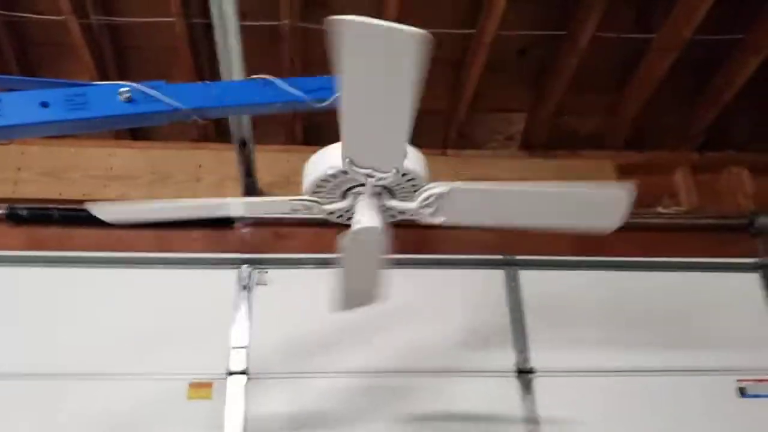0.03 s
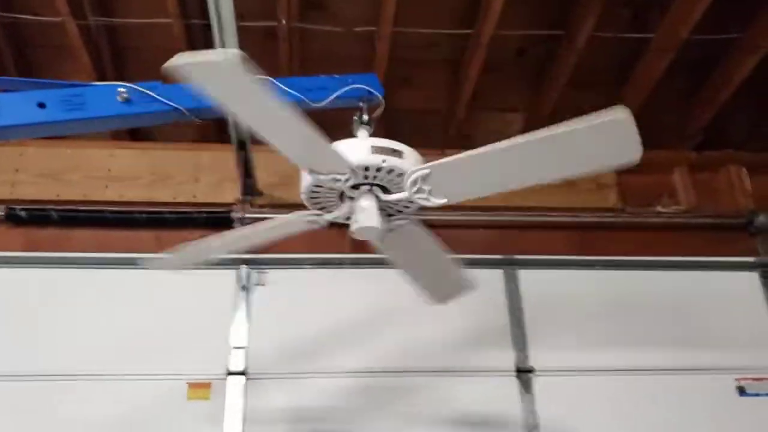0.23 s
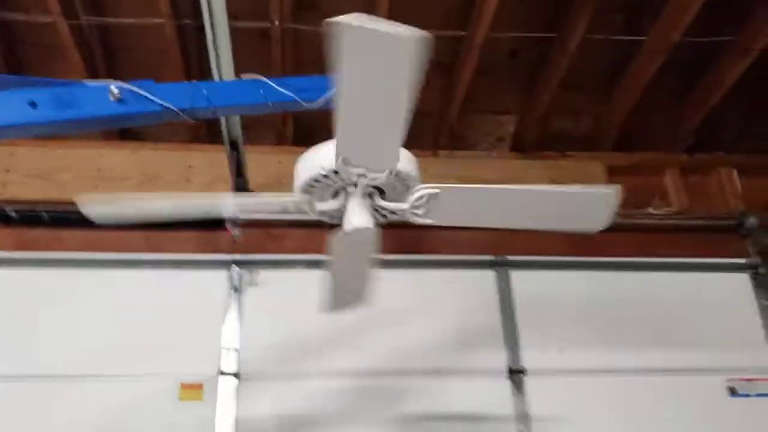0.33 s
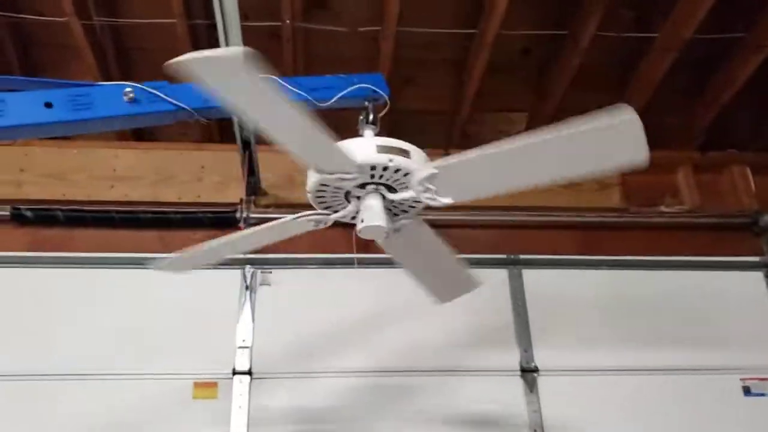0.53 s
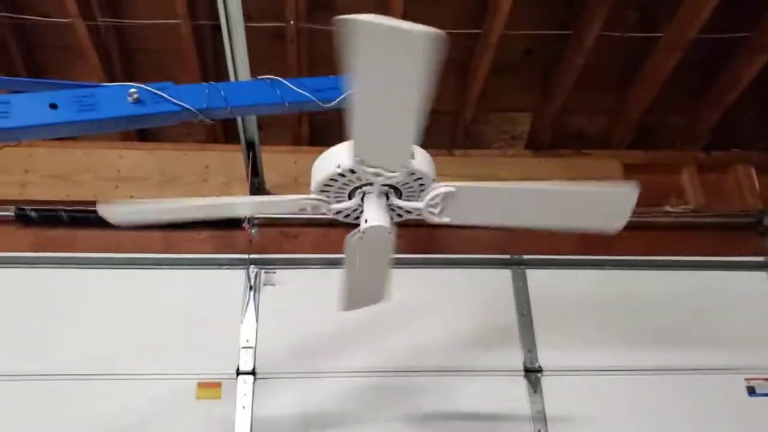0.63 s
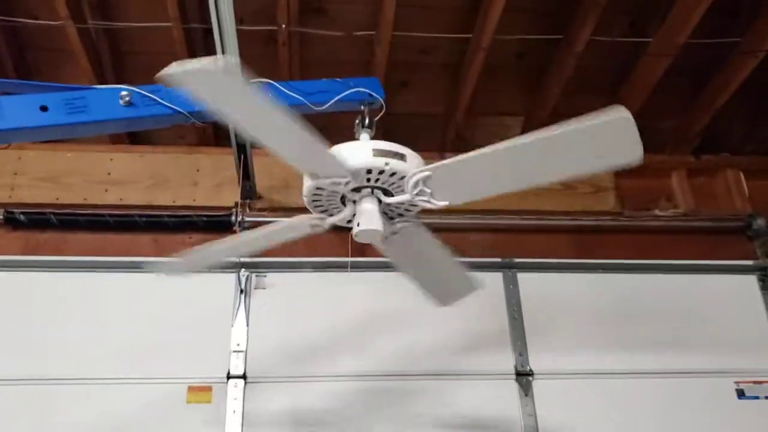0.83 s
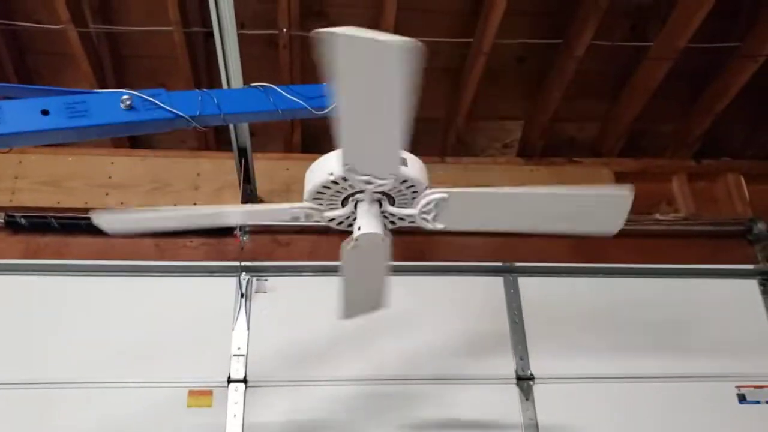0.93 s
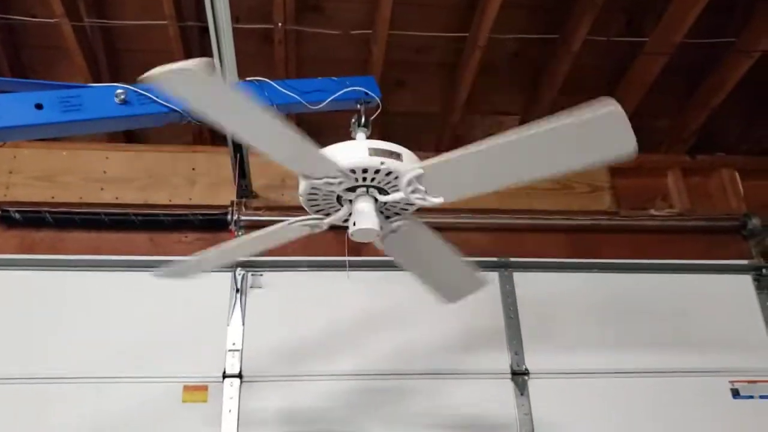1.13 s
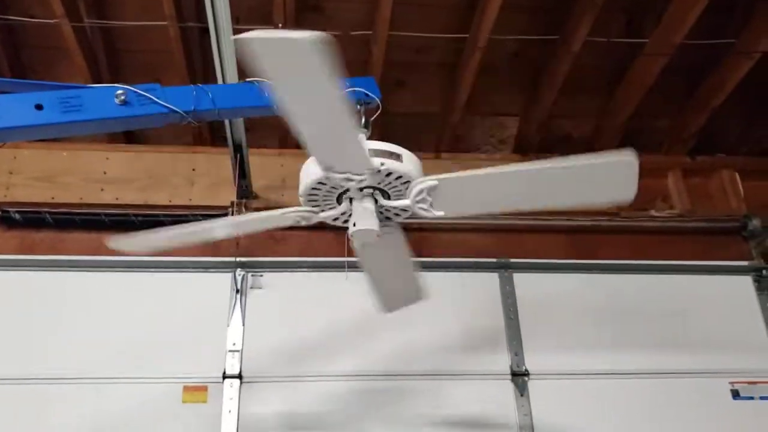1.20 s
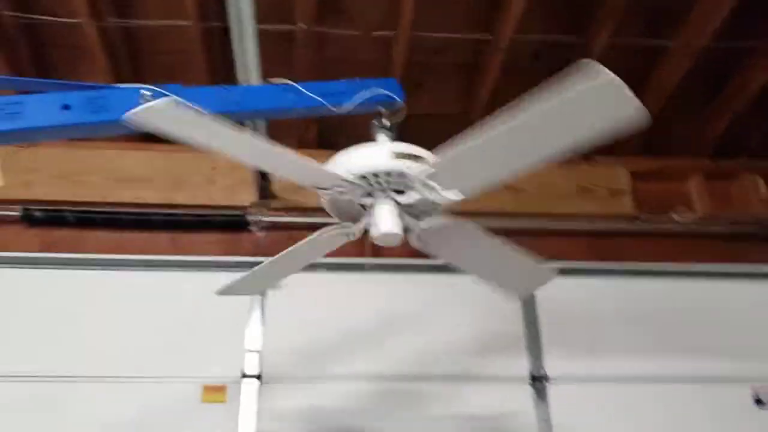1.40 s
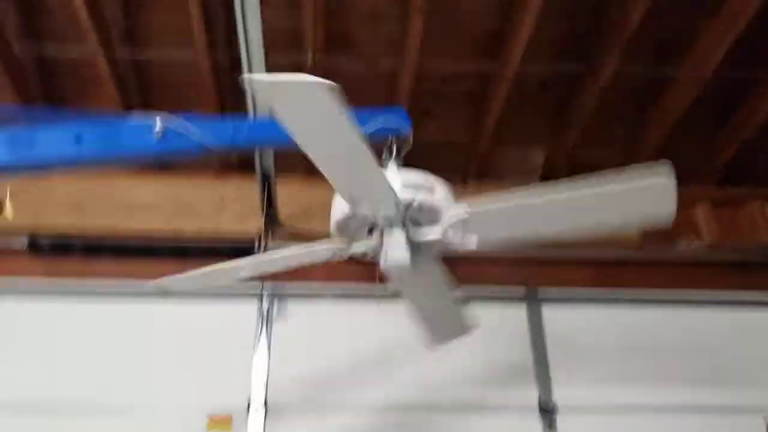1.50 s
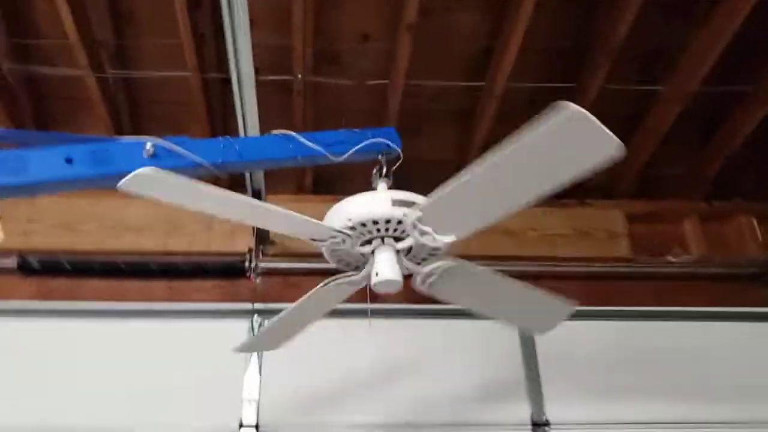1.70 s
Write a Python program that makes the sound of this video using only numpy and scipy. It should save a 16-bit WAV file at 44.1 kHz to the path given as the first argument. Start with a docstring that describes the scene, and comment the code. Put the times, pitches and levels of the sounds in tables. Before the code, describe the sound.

A ceiling fan hums faintly, with two louder bumps from a hand on the microphone.

```python
"""A ceiling fan turns slowly in a garage: its motor hums faintly over a soft hiss of air.
The hand that holds the microphone shifts its grip twice. Fingers knock and scrape on the case,
which rings and thumps, then skin slides over it. The case also gives a few tiny, high ticks.
The garage adds a weak echo to the knocks and thumps."""
import sys
import numpy as np
from scipy import signal
from scipy.fft import rfft, irfft
from scipy.io import wavfile

SR = 44100
rng = np.random.default_rng(int(sys.argv[2]) if len(sys.argv) > 2 else 0)


def wav_out(sig):
    """Save sig, one row per channel (or a flat mono array), as 16-bit PCM at SR to the path in sys.argv[1]."""
    wavfile.write(sys.argv[1], SR, np.round(np.clip(np.atleast_2d(sig).T, -1, 1) * 32767).astype(np.int16))


N = 77175
TIME = np.arange(N) / SR

# The motor's tones, multiples of the mains frequency: pitch_hz, level_db
HUM_TONES = [(120, -88.5), (240, -82.5), (360, -75.5), (480, -87)]
# How the hum grows louder and softer: time_s, change_db
HUM_WAVER = [(0, -5), (.55, 2), (.9, -1), (1.15, -6.5), (1.47, 5), (1.75, -5.5)]
# The air's hiss, from bass to treble: frequency_hz, relative_db
AIR_SPECTRUM = [(25, -16), (55, 6), (90, -0.5), (170, -16), (280, -17.5), (390, -15.5), (560, -23.5),
                (850, -24.5), (1100, -21.5), (1500, -10), (2100, -4.5), (2500, -14), (3050, -36.5),
                (3750, -14.5), (4600, -31.5), (6500, -30), (8200, -43.5), (11000, -33), (15500, -27.5)]
# Which side the hiss leans to (pan is left minus right): frequency_hz, pan_db
AIR_PAN = [(60, -3.5), (200, -2), (750, -4), (1350, 22), (2400, 12.5), (4400, 13), (8000, 1), (15000, 3)]
# How alike the hiss is on both sides (1 is the same, 0 unrelated): frequency_hz, likeness
AIR_STEREO_LIKENESS = [(60, 0.23), (290, 0.84), (640, 0.19), (1410, -0.2), (3100, 0.12), (8000, -0.093)]
# Fingers knock on the case: start_s, level_db, dull_above_hz, pan_db, rattle_share, rattle_fade_s
FINGER_KNOCKS = [(0.159, -36.5, 1560, -8.5, 0.16, 0.0034), (.1617, -40, 2440, -3.5, 0.13, 0.00089),
                 (0.1653, -39.5, 715, -39, 0.068, 0.0024), (0.188, -37.5, 1960, -3.5, 0.24, 0.0026),
                 (0.2335, -21.5, 2800, 2, .04, 0.0012), (0.266, -39.5, 930, -7, 0.17, 0.0037),
                 (0.3116, -38.5, 3470, 1, 0.087, 0.0023), (0.3474, -50.5, 1270, 1.5, 0.41, 0.0029),
                 (.382, -53.5, 1080, -8.5, 0.4, .008), (1.273, -52.5, 930, -12.5, 0.26, 0.0057),
                 (1.31, -37, 1830, 5.5, 0.12, 0.0015), (1.3114, -36, 2860, -3, 0.27, .002),
                 (1.3247, -32, 1070, -18, 0.098, 0.0025), (1.3281, -32.5, 2540, -13, 0.099, 0.0056),
                 (1.3366, -24.5, 1340, -6, 0.12, 0.0014)]
# The tones of the knocked case: pitch_hz, relative_db, ring_s
CASE_TONES = [(230, -25.5, 0.041), (315, -25.5, 0.019), (574, -18, 0.0083), (877, -24.5, 0.017),
              (1190, -19, 0.0085), (1570, -20, 0.004), (2570, -16.5, 0.0054)]
# Fingers scrape the case: middle_s, width_s, level_db, pan_db, dull_above_hz
FINGER_SCRAPES = [(.162, 0.0013, -37.5, -9, 14100), (0.1666, 0.00064, -40, -34, 15600),
                  (0.177, 0.0044, -47.5, -1.5, 14300), (1.311, 0.0061, -46.5, -2, 5600),
                  (1.315, 0.015, -53.5, -17, 15800), (1.327, 0.0023, -40, -7, 15500),
                  (1.337, 0.0013, -40, -29, 14400), (1.738, 0.016, -66, 5, 7100)]
# The scraping, from bass to treble: frequency_hz, relative_db
SCRAPE_SPECTRUM = [(100, 9.5), (900, 4), (2200, -0.5), (3200, -10), (4800, -5.5), (7500, -15.5),
                   (9500, -27), (12000, -15.5), (15500, -11)]
# The jolted case thumps: start_s, level_db, pitch_hz, rise_s, pan_db
CASE_THUMPS = [(0.1663, -24, 63.2, .008, -10), (0.167, -32.5, 165, 0.0029, -15),
               (0.196, -43, 53.3, 0.018, 20), (0.2375, -31.5, 59.3, 0.0093, -16),
               (0.283, -49, 76.3, 0.012, -11), (.380, -46, 285.4, 0.0051, -20),
               (1.314, -35, 99.4, 0.0089, -24), (1.3377, -31, 91, 0.0036, -52)]
# Skin slides over the case: middle_s, width_s, level_db, pan_db
SKIN_SLIDES = [(0.189, 0.017, -57.5, -7), (0.299, 0.075, -58.5, 3.5), (0.402, 0.054, -58, 3),
               (0.509, 0.12, -64.5, 2.5), (1.2, 0.09, -72.5, 3), (1.307, 0.026, -63, -14),
               (1.368, 0.031, -60, 8.5), (1.64, .12, -63.5, 5.5)]
# The sliding, from bass to treble: frequency_hz, relative_db
SLIDE_SPECTRUM = [(40, 4), (80, 11.5), (160, -3), (300, -2), (450, 3.5), (680, -12.5), (1050, -9.5),
                  (1500, -8), (2200, -10), (3100, -18), (3900, -11.5), (4500, -17), (5500, -13.5),
                  (7000, -23.5), (8800, -45), (15500, -26)]
# The case ticks: start_s, high_tone_db, low_tone_db
CASE_TICKS = [(.403, -47, -49.5), (.444, -39, -59), (.618, -48, -53.5), (0.803, -66, -63), (.973, -48, -72),
              (1.0122, -35.5, -57.5), (1.3995, -40.5, -44.5), (1.5625, -44, -63), (1.6445, -39.5, -52)]

AIR_DB, HUM_PAN_DB = -64.5, -4
CASE_RING_DB, KNOCK_LOW_HZ, KNOCK_TOP_HZ = -15, 104, 6340
FAR_SIDE_LAG_S_PER_DB, THUMP_LAG_S = .00006, .0044
GARAGE_DB, GARAGE_RING_S = -26, .35
SLIPS_PER_S, SLIP_SPREAD_DB = 5000, 4
SLIDE_LIKENESS, SLIDE_ROUGH_DB = .54, 2
TICK_PAN_DB, TICK_TAIL_DB, TICK_TAIL_S = 33, -34.5, .047
CUTOFF_HZ = 16000


def from_db(db):
    """Turn decibels into a number to multiply a sound by."""
    return 10 ** (np.asarray(db) / 20)


def unit_level(x):
    """Scale a sound to an average power of 1."""
    return x / np.sqrt(np.mean(x ** 2) + 1e-20)


def pan(db):
    """Share a sound's power between the sides; positive leans left."""
    gains = from_db(np.array([[.5], [-.5]]) * db)
    return gains / np.sqrt(np.mean(gains ** 2, axis=0))


def per_frequency(points):
    """Fill in a table's value at every frequency of the sound."""
    hz, value = np.transpose(points)
    all_hz = np.arange(N // 2 + 1) * SR / N
    return np.interp(np.log(all_hz + 1), np.log(hz), value)


def keep_band(x, hz, kind, order=2):
    """Keep the "low" or "high" side of hz; a higher order cuts more steeply."""
    sections = signal.butter(order, hz, kind, fs=SR, output="sos")
    return signal.sosfilt(sections, x + 1e-18)


def colour(x, spectrum):
    """Shape a sound's bass and treble, then scale it to a power of 1."""
    shaped = irfft(rfft(x) * from_db(per_frequency(spectrum)), N)
    return unit_level(keep_band(shaped, 15, "high"))


def drift(rate_hz):
    """A random wobble, about 1 in size."""
    fast = keep_band(rng.standard_normal(2 * N), 10 * rate_hz, "low")[N:]
    return unit_level(fast)[np.arange(N) // 10]  # slowed ten times


def stereo_noise(likeness):
    """Even hiss, partly shared by left and right."""
    shared, opposite = rfft(rng.standard_normal((2, N)))
    return irfft(np.sqrt(1 + likeness) * shared + np.sqrt(1 - likeness) * opposite * [[1], [-1]], N)


def decay(start_s, fade_s):
    """A sudden start and a smooth fade."""
    return (TIME >= start_s) * np.exp(-np.abs(TIME - start_s) / fade_s)


def ring(x, hz, ring_s):
    """Each click in x starts a tone that fades by 60 dB in ring_s."""
    shrink = from_db(-60 / (ring_s * SR))
    angle = 2 * np.pi * hz / SR
    return signal.lfilter([0, np.sin(angle)], [1, -2 * shrink * np.cos(angle), shrink ** 2], x + 1e-18)


def stroke(middle_s, width_s, db, pan_db):
    """The left and right strength of one rub, which swells and fades."""
    return from_db(db) * pan(pan_db) * np.exp(-.5 * ((TIME - middle_s) / width_s) ** 2)


def fan():
    """Mains power makes the motor hum; the hum wavers over a steady hiss of air."""
    hum = sum(from_db(db) * np.sin(2 * np.pi * (hz * TIME + rng.random())) for hz, db in HUM_TONES)
    waver = from_db(np.interp(TIME, *np.transpose(HUM_WAVER)))
    hiss = stereo_noise(per_frequency(AIR_STEREO_LIKENESS))
    air = irfft(rfft(hiss) * pan(per_frequency(AIR_PAN)), N)
    return hum * waver * pan(HUM_PAN_DB) + from_db(AIR_DB) * colour(air, AIR_SPECTRUM)


def knocks():
    """Each knock is a click and a brief rattle, dulled by the soft finger; it makes the case ring."""
    hits = np.zeros((2, N))
    for start_s, db, dull_hz, pan_db, rattle_share, fade_s in FINGER_KNOCKS:
        click = np.zeros((2, N))
        # The quieter side hears the click a little later.
        arrivals_s = start_s + FAR_SIDE_LAG_S_PER_DB * np.maximum([-pan_db, pan_db], 0)
        click[[0, 1], (arrivals_s * SR).astype(int)] = 1
        rattle = rattle_share * rng.standard_normal((2, N)) * decay(start_s, fade_s)
        dulled = keep_band(click + rattle, dull_hz, "low", order=3)
        click_peak = keep_band(click, dull_hz, "low", order=3).max()
        hits += from_db(db) * pan(pan_db) * dulled / click_peak
    ringing = sum(from_db(db) * ring(hits, hz, ring_s) for hz, db, ring_s in CASE_TONES)
    body = keep_band(hits + from_db(CASE_RING_DB) * ringing, KNOCK_TOP_HZ, "low", order=4)
    return keep_band(body, KNOCK_LOW_HZ, "high", order=1)


def garage_echo(x):
    """The room answers a sound with a weak, dull echo."""
    tail = keep_band(rng.standard_normal((2, N)), 7100, "low") * from_db(-60 * TIME / GARAGE_RING_S)
    tail /= np.sqrt(np.sum(tail ** 2) / 2)
    return from_db(GARAGE_DB) * signal.fftconvolve(x, tail, axes=1)[:, :N]


def scrapes():
    """Each short, gritty scrape of a finger is a quick run of tiny slips."""
    slips = (rng.random((2, N)) < SLIPS_PER_S / SR) * rng.choice([-1, 1], (2, N))
    strengths = from_db(SLIP_SPREAD_DB * rng.standard_normal((2, N)))
    grit = colour(slips * strengths, SCRAPE_SPECTRUM)
    return sum(keep_band(grit * stroke(middle_s, width_s, db, pan_db), dull_hz, "low", order=3)
               for middle_s, width_s, db, pan_db, dull_hz in FINGER_SCRAPES)


def thumps():
    """A jolt to the case makes a low tone that swells and dies fast, a little later on the left."""
    out = np.zeros((2, N))
    for start_s, db, hz, rise_s, pan_db in CASE_THUMPS:
        age_s = np.maximum(TIME - start_s - np.array([[THUMP_LAG_S], [0]]), 0)
        swell = age_s / rise_s * np.exp(1 - age_s / rise_s)
        out += from_db(db) * pan(pan_db) * swell * np.sin(2 * np.pi * hz * age_s)
    return out


def slides():
    """Skin sliding over the case makes a soft, uneven rush."""
    rush = colour(stereo_noise(SLIDE_LIKENESS), SLIDE_SPECTRUM)
    roughness = from_db(SLIDE_ROUGH_DB * drift(rate_hz=67))
    strength = np.sqrt(sum(stroke(*slide) ** 2 for slide in SKIN_SLIDES))
    return rush * roughness * strength


def ticks():
    """Tiny snaps on the left of the case set two high tones ringing and leave a faint tail."""
    high, low = np.zeros((2, 2, N))
    for start_s, high_db, low_db in CASE_TICKS:
        snap = from_db(TICK_TAIL_DB) * rng.standard_normal((2, N)) * decay(start_s, TICK_TAIL_S)
        snap[:, int(start_s * SR)] = 1  # the click that leads the tail
        high += from_db(high_db) * snap
        low += from_db(low_db) * snap
    high = keep_band(ring(high, hz=15400, ring_s=.0014), 14400, "high")
    low = keep_band(ring(low, hz=5940, ring_s=.0027), 3700, "high")
    return pan(TICK_PAN_DB) * (high + low)


def scene():
    """The fan, and the hand on the case close by."""
    bumps = knocks() + thumps()
    return fan() + bumps + garage_echo(bumps) + scrapes() + slides() + ticks()


def record(dry):
    """Cut away the very highest treble."""
    return signal.sosfilt(signal.ellip(10, .2, 70, CUTOFF_HZ, fs=SR, output="sos"), dry)


dry = scene()
out = record(dry)
wav_out(out)
```